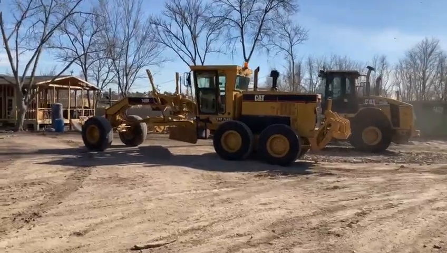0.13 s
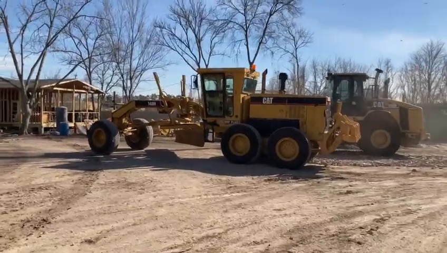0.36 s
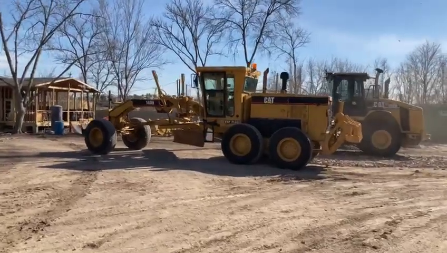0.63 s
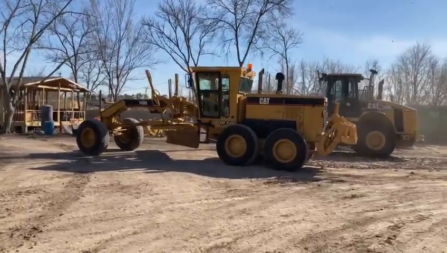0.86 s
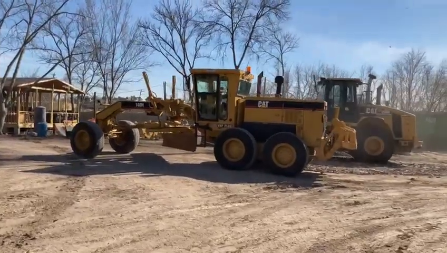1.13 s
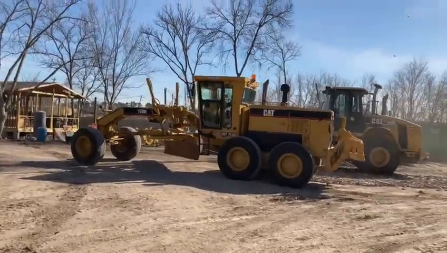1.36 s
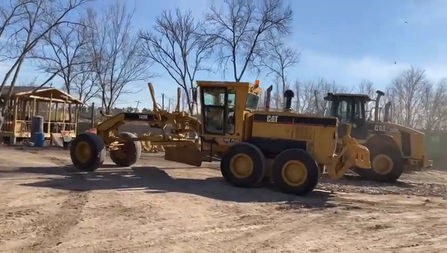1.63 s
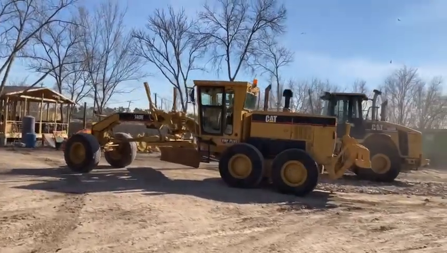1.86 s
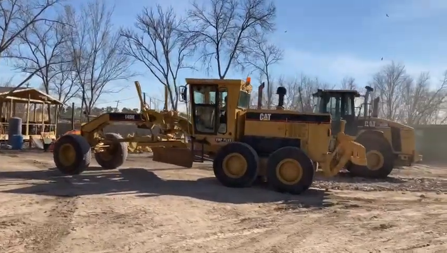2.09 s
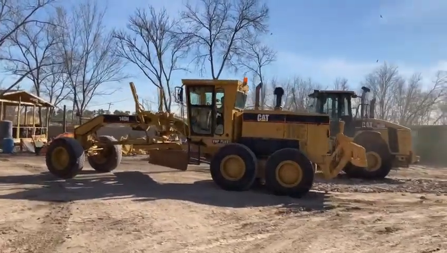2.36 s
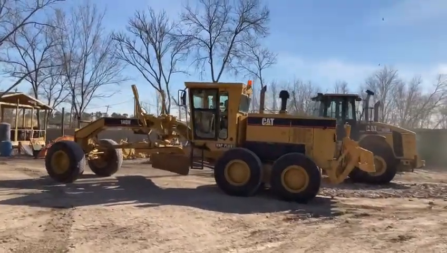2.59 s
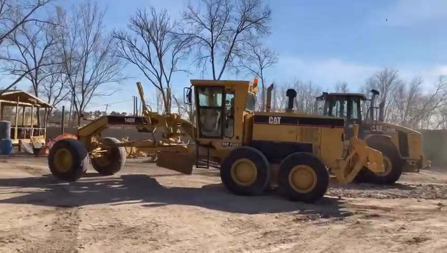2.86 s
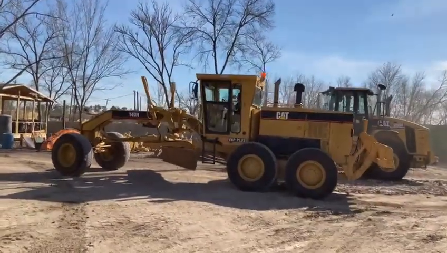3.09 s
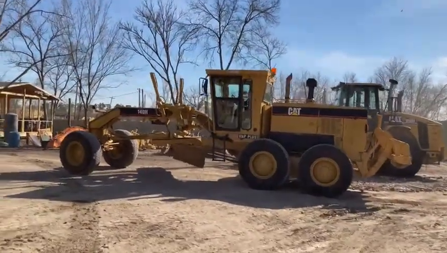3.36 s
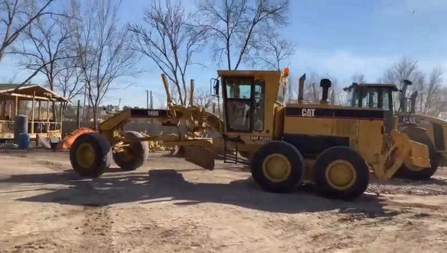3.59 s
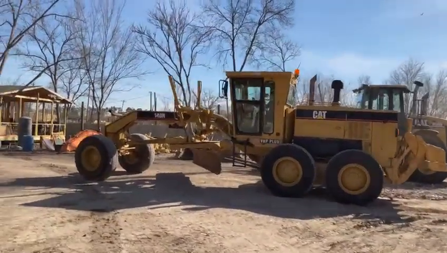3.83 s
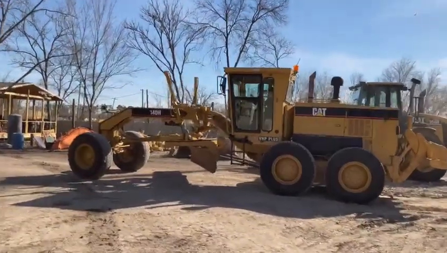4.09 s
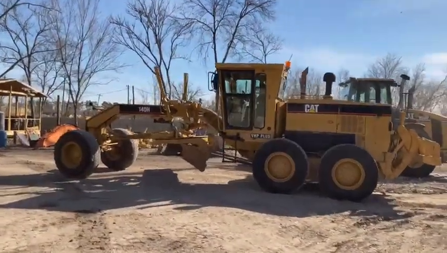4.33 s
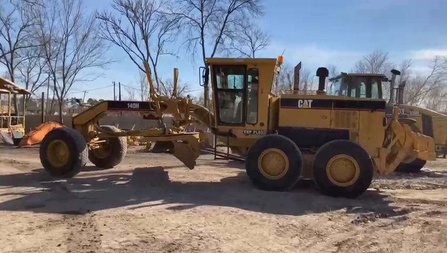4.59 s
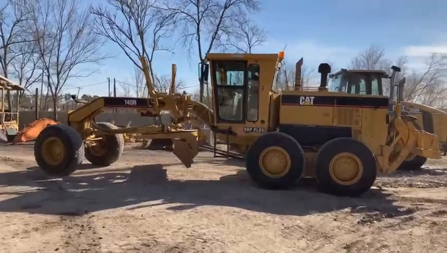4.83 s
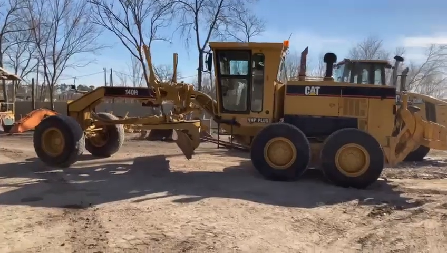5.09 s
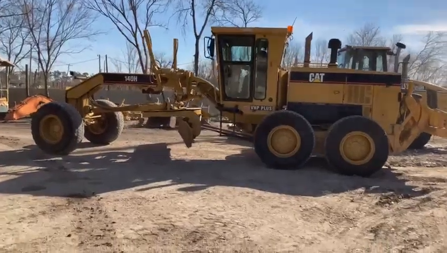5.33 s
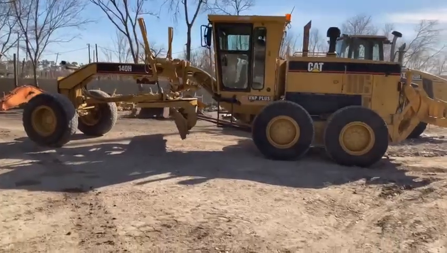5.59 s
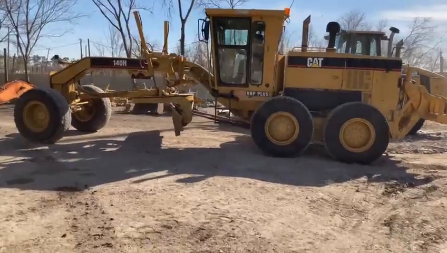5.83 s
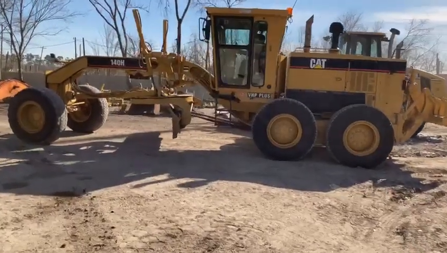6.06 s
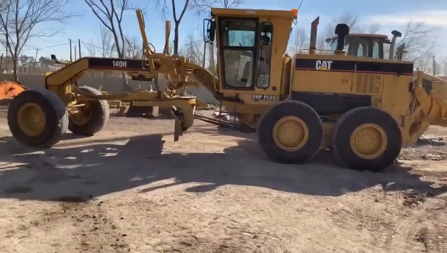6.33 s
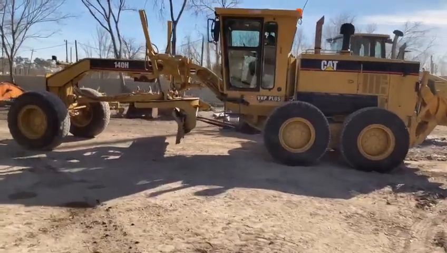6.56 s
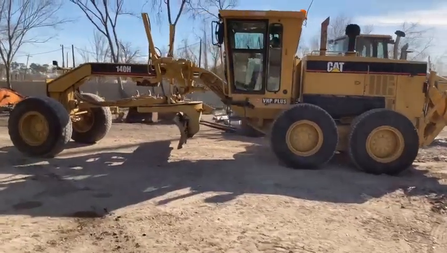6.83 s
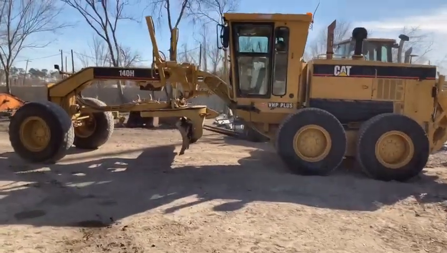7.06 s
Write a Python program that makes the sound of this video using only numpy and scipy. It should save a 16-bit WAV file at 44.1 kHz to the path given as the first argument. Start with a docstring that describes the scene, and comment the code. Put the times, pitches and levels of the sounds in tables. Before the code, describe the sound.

Outdoors in an open dirt yard, a hand-held stereo recorder picks up a large diesel grader. It idles slow and lumpy with a few soft wind thumps, surges up in pitch, sags briefly, surges again, then settles into a fast steady engine drone. Panels ring, valves and gears clatter, cooling air hisses and a loose part rattles lightly as it grows louder and closer.

```python
"""Road grader drawing near

A six-cylinder road grader idles in a dirt yard, revs up in two surges and settles at a steady speed as it nears.
The exhaust hums on the firing order, sine tones ring on multiples of the shaft speed, and noise that jumps
at the firings makes panels ring, clatter and cooling air. A part rattles, a low drone joins in late,
and a little wind buffets the two microphone ports of a hand-held recorder."""
import sys
import numpy as np
from scipy import signal
from scipy.fft import rfft, irfft, next_fast_len
from scipy.io import wavfile
from scipy.ndimage import uniform_filter1d

SR = 44100
rng = np.random.default_rng(int(sys.argv[2]) if len(sys.argv) > 2 else 0)


def volts_from_db(level):
    """Convert decibel levels to linear amplitude ratios."""
    exponent = np.asarray(level, float) / 20
    return 10 ** exponent


def dump(signal):
    """Clip the signal to [-1, 1] and save it as 16-bit WAV at the path in sys.argv[1]."""
    limited = np.clip(np.atleast_2d(signal).T, -1, 1)
    pcm = np.round(limited * 32767).astype(np.int16)
    wavfile.write(sys.argv[1], SR, pcm)


N = 317079


def unit(x):
    """Scales a sound to an rms (average strength) of 1."""
    return x / np.sqrt(np.mean(x ** 2) + 1e-20)


def in_time(rows):
    """Joins each column of a table by straight lines, one value a sample."""
    s, *columns = np.transpose(rows)
    return [np.interp(np.arange(N) / SR, s, c) for c in columns]


def shaped(x, hz, gain_db):
    """Filter whose dB curve is straight on a log-frequency axis."""
    size = next_fast_len(N)
    bins = np.log(np.arange(size // 2 + 1) * SR / size + 1)
    gain = volts_from_db(np.interp(bins, np.log(hz), gain_db))
    return irfft(rfft(x, size) * gain, size)[..., :N]


def drift(rate_hz):
    """Slow random wandering of rms 1, made at every 40th sample and joined by lines."""
    r = np.exp(-80 * np.pi * rate_hz / SR)
    noise = rng.standard_normal(N // 40 + 2002)
    slow = signal.lfilter([1], [1, -2 * r, r * r], noise)[2000:]   # skip the filter's start
    return np.interp(np.arange(N) / 40, np.arange(len(slow)), unit(slow - slow.mean()))


def resonance(x, hz, width_hz):
    """Rings like a struck panel or pipe: a two-pole band with gain 1 on top."""
    r = np.exp(-np.pi * width_hz / SR)
    poles = [1, -2 * r * np.cos(2 * np.pi * hz / SR), r * r]
    return signal.lfilter([(1 - r * r) / 2, 0, (r * r - 1) / 2], poles, x)


# how fast the crankshaft turns: [t/s, speed/turns per s]
CRANK_SPEED = [(0.0, 13.43), (1.3, 13.43), (1.5, 14.6), (1.62, 16.7), (1.98, 19.5), (2.1, 18.95),
               (2.25, 17.95), (2.4, 17.55), (2.55, 17.75), (2.7, 18.55), (2.8, 19.55), (2.97, 21.75),
               (3.05, 22.0), (3.2, 22.3), (3.78, 22.85), (4.1, 23.9), (4.4, 24.22), (4.55, 24.57),
               (4.72, 24.57), (4.83, 24.3), (5.15, 24.58), (5.5, 24.74), (5.65, 24.66), (5.82, 24.43),
               (6.12, 24.48), (6.5, 24.31), (7.19, 24.37)]


def crank_speed():
    """The shaft speed sets the pitch of all engine tones and the pace of the knocks."""
    return in_time(CRANK_SPEED)[0]


# state of the machine: [t/s, stage (0 idle, 1 revving, 2 close by)]
MACHINE_STAGE = [(0, 0.), (1.15, 0.), (1.5, 1.), (3.6, 1.), (4.8, 2.), (7.19, 2.)]


def by_stage(values):
    """Glides between the values for idle, revving and close by."""
    return np.interp(in_time(MACHINE_STAGE)[0], [0, 1, 2], values)


# work of the engine as heard: [t/s, exhaust note level/dB, clatter and air level/dB]
ENGINE_EFFORT = [(0.0, -45, -36.5), (0.6, -36.5, -40), (1.0, -37.5, -39.5), (1.3, -38, -38),
                 (1.42, -33, -34.5), (1.52, -29.5, -35), (1.65, -27.5, -32.5), (1.85, -26, -33),
                 (2.05, -28.5, -36.5), (2.25, -27.5, -35), (2.4, -24.5, -32.5), (2.7, -25, -31.5),
                 (2.85, -22, -29.5), (3.0, -25, -30.5), (3.2, -25.5, -31), (3.5, -26, -31.5),
                 (4.0, -23.5, -30.5), (4.5, -22, -29.5), (5.5, -22.5, -29), (6.5, -22, -29),
                 (7.19, -22, -29.5)]


def effort():
    """A harder-working engine sounds louder: levels of the exhaust note and of the air."""
    return in_time(ENGINE_EFFORT)


# octave above the exhaust note: [speed/turns per s, level against the note/dB]
OCTAVE_LEVEL = [(13.4, -1), (14.7, 2), (16.4, -13), (17.5, -6), (18.3, -4), (19.3, -3.5), (21.0, -3),
                (22.5, 0), (24.3, 1), (24.7, 1)]


def hum(turns, speed, note_db, waver_db):
    """Three firings a turn make the exhaust note; its octave keeps step but wavers on its own."""
    octave_db = note_db + np.interp(speed, *np.transpose(OCTAVE_LEVEL))
    third = volts_from_db(note_db + waver_db * drift(9)) * np.cos(6 * np.pi * turns)
    sixth = volts_from_db(octave_db + waver_db * drift(9)) * np.cos(12 * np.pi * turns + .9)
    return np.sqrt(2) * (third + sixth)


# block and gear train tones, before the overall lift, shifting as the machine turns and nears:
# [multiple of the shaft speed, idle level/dB, level/dB at each of four moments at working speed]
SHAFT_TONES = [(3.5, -60, -50, -39, -40, -40), (4, -60, -46, -44, -39, -43), (7, -55, -39, -38, -37, -35),
               (9, -41, -42, -48, -50, -50), (10, -55, -48, -38, -37, -36), (11, -50, -45, -39, -37, -38),
               (11.5, -50, -41, -46, -52, -50), (12, -55, -43, -42, -37, -36),
               (13, -58, -46, -39, -39, -43), (14, -49, -44, -43, -45, -42), (15, -58, -58, -52, -44, -42),
               (16, -58, -50, -46, -41, -35), (17, -58, -45, -37, -34, -35), (18, -58, -42, -35, -38, -40),
               (20, -49, -52, -50, -50, -48), (21, -60, -42, -45, -44, -43), (24, -49, -50, -50, -48, -47),
               (25.5, -60, -42, -46, -42, -40), (27, -60, -42, -45, -46, -45),
               (29, -60, -48, -46, -42, -39), (31, -60, -52, -43, -40, -37), (32, -60, -55, -40, -40, -41),
               (33, -62, -43, -50, -52, -52), (36, -50, -50, -43, -46, -50), (38, -51, -56, -37, -37, -38),
               (40, -56, -60, -54, -52, -45), (41, -58, -60, -49, -46, -46), (42, -60, -60, -54, -43, -43),
               (43, -54, -54, -49, -45, -42), (43.5, -60, -55, -46, -45, -41),
               (44, -60, -58, -46, -43, -41), (44.5, -58, -58, -41, -48, -46),
               (45, -56, -58, -44, -40, -41), (46, -49, -56, -52, -56, -50), (47, -52, -54, -46, -46, -49),
               (48, -52, -50, -39, -38, -50), (49, -54, -43, -50, -56, -56), (51, -52, -58, -54, -46, -44),
               (52.5, -50, -60, -54, -43, -52), (53, -46, -60, -56, -46, -52),
               (54, -56, -60, -58, -52, -43), (55, -51, -60, -55, -48, -52),
               (55.5, -58, -60, -51, -47, -45), (58, -60, -60, -60, -56, -46),
               (58.5, -60, -60, -56, -48, -42), (61.5, -56, -58, -49, -46, -55),
               (63, -62, -49, -53, -48, -50), (78, -53, -62, -58, -60, -58), (79, -60, -60, -50, -56, -49),
               (82.5, -52, -58, -46, -60, -60), (84, -58, -60, -48, -58, -58)]
# those four moments: [t/s]
NEARING_MOMENTS = [3.5, 4.55, 5.4, 6.3]
# the idle tones fade between these: [speed/turns per s]
IDLE_FADE = [13.5, 14.5]
# the working tones swell in from the first speed to WORKING_TURNS (turns per s)
TONES_FROM_TURNS, WORKING_TURNS = 17.8, 22.0


def shaft_tones(turns, speed, lift_db, waver_db):
    """Each multiple of the shaft rings at idle, fades, swells in at working speed and wavers on its own."""
    out, s = np.zeros(N), np.arange(N) / SR
    idling = np.interp(speed, IDLE_FADE, [1, 0])
    working = np.clip((speed - TONES_FROM_TURNS) / (WORKING_TURNS - TONES_FROM_TURNS), 0, 1)
    for order, idle_db, *place_db in SHAFT_TONES:
        gain = idling * volts_from_db(idle_db) + working * volts_from_db(np.interp(s, NEARING_MOMENTS, place_db))
        # orders below 20 peak nearly together, a knock once a turn
        spread_turns = .018 if order < 20 else 1
        late = rng.standard_normal() * spread_turns
        out += gain * volts_from_db(waver_db * drift(1.2)) * np.cos(2 * np.pi * order * (turns + late))
    return np.sqrt(2) * volts_from_db(lift_db) * out


def surge(speed):
    """How hard the engine accelerates, 0-1; full at 6.3 turns per s gained each second."""
    acceleration = uniform_filter1d(np.gradient(speed) * SR, size=4410)
    return np.clip(acceleration / 6.3, 0, 1)


# growling shaft tones: [multiple of the shaft speed, level before the pipe/dB]
GROWL_TONES = [(4, -8), (4.5, -1), (8, -6), (9, 2), (12, 1), (13, 6), (14, -9), (15, -3), (16, -11),
               (21, 4), (22, -6), (24, 0), (33, -8), (36, -1), (38, 0), (39, 2), (40, -3)]
# resonances of the exhaust line that lift a tone sweeping through them: [f/Hz, width/Hz, level/dB]
EXHAUST_PIPE = [(91, 17, -14), (156.6, 31, -7), (219, 19, -11), (276.4, 34, -8), (439, 46, -13.5),
                (621, 46, -11.5), (786, 35, -11)]


def surge_tones(turns, speed, note_db, uneven_db):
    """Wavering shaft tones ring the exhaust pipe, strongest in a surge, never silent below working speed."""
    orders = 0
    for order, db in GROWL_TONES:
        tone = np.cos(2 * np.pi * (order * turns + rng.random()))
        orders = orders + volts_from_db(db + uneven_db * drift(12.0)) * tone
    rings = 0
    for hz, width, db in EXHAUST_PIPE:
        rings = rings + volts_from_db(db) * resonance(resonance(orders, hz, width), hz, width)
    pull = np.maximum(surge(speed), 0.47 * (speed < WORKING_TURNS))
    return np.sqrt(2) * volts_from_db(note_db) * uniform_filter1d(pull, size=2205) * rings


# share of the repeating blows at idle, revving and close by: [factor]
BLOW_SHARE = [2.2, 1.0, 1.0]


def cycle_pattern(turns, speed):
    """Valves, gears and pumps repeat a fine pattern of blows each two-turn engine cycle; it changes slowly."""
    steps = 512
    patterns = rng.standard_normal((2, steps))
    patterns = unit(patterns + .3 * np.roll(patterns, steps // 2, axis=1))   # the two turns are rather alike
    place = turns / 2 % 1 * steps
    first, second = (np.interp(place, np.arange(steps), p, period=steps) for p in patterns)
    blend = .9 * drift(.55)
    # more steps a second spread the sound wider, so it grows with speed
    density = np.sqrt(speed / 2 * steps / SR)
    return by_stage(BLOW_SHARE) * density * (np.cos(blend) * first + np.sin(blend) * second)


# strength of each firing in turn, before the random unevenness: [level/dB]
CYLINDER_STRENGTH = [1, -7, -3, -14, -10, -4]


def knocks(turns, depth, uneven_db):
    """Noise that jumps at every firing and dies down before the next; strengths vary at random."""
    firing = 3 * turns
    count = firing.astype(int)
    uneven = uneven_db * np.tanh(rng.standard_normal(600))[count]
    strength = volts_from_db(np.take(CYLINDER_STRENGTH, count, mode="wrap") + uneven)
    gate = 1 + depth * strength * np.exp(-3.0 * (firing - count))
    return unit(gate) * rng.standard_normal((2, N))


# colour of the low rush, before it is scaled: [f/Hz, relative level/dB per Hz]
RUSH_COLOUR = [(25, -25), (45, 5.5), (100, 0.5), (200, 0), (330, -5), (600, -6), (1200, -36.5)]


def rush(turns, pattern):
    """Low roar: noise jumping at the firings, plus the repeating blows, filtered to low pitches."""
    blows = knocks(turns, depth=0.29, uneven_db=19.5) + 0.31 * pattern
    return unit(shaped(blows, *np.transpose(RUSH_COLOUR)))


# how deeply the treble throbs with the firings at idle, revving and close by: [depth]
BEAT_DEPTH = [.3, .15, .05]


def firing_beat(turns):
    """A gain that rises and falls three times a turn, once a firing."""
    return 1 + by_stage(BEAT_DEPTH) * np.cos(6 * np.pi * turns)


# hood panels and casing, relative to each other:
# [f/Hz, width/Hz, idle level/dB, revving level/dB, close-by level/dB]
PANELS = [(286, 36, -16, -26, -11), (444, 187, -2, 1.5, 3), (641, 56, 1.5, 5, -7), (682.6, 75, 3, 4, 1.5),
          (724, 128, -5.5, 1, -9), (1098, 83, -1, 2.5, -2.5), (1254, 180, -4, -6.5, -10),
          (1850, 310, -10.5, -11, -23), (1998, 78, -5, -11, -13.5), (2142, 99, -14, -9.5, -12),
          (2314, 39, -36, -30, -15), (2563, 33, -9, -19, -39), (3000, 84, -17, -14.5, -13.5),
          (3267, 23, -18, -33, -61), (3520, 730, -24, -16.5, -32)]


def casing(drive, beat):
    """The knocks ring the panels; their balance shifts as the machine revs, turns and nears."""
    rings = 0
    for k, (hz, width, *stage_db) in enumerate(PANELS):
        level_db = by_stage(stage_db) + .7 * drift(1.5) + 1.8 * drift(9)
        throb = beat if hz > 1500 else 1
        # two passes narrow a band, so each is made wider
        ring = resonance(resonance(drive, hz, 1.62 * width), hz, 1.62 * width)
        rings = rings + (-1) ** k * volts_from_db(level_db) * throb * unit(ring)
    return unit(rings)


# colour of clatter and air, before it is scaled: [f/Hz, relative level/dB per Hz]
AIR_COLOUR = [(300, -13.5), (900, -1.5), (1600, -9.5), (2500, -13), (4300, -16.5), (5600, -20), (6700, -17),
              (8000, -16), (10800, -5.5), (11700, -10.5), (12000, -79)]


def air(turns, pattern):
    """Clatter and cooling air: bands of knocking noise that flutter apart."""
    out, edges_hz = 0, [100, 1600, 2800, 4200, 5600, 9000, 16000]
    for low, high in zip(edges_hz[:-1], edges_hz[1:]):
        band = signal.butter(4, [low, high], "band", fs=SR, output="sos")
        flutter = volts_from_db(0.85 * drift(10.0) + 0.92 * drift(41))
        noise = knocks(turns, depth=0.1, uneven_db=18.5) + pattern
        out = out + flutter * signal.sosfilt(band, noise)
    return unit(shaped(out, *np.transpose(AIR_COLOUR)))


# how loud the loose part is: [t/s, level/dB]
RATTLE_STRENGTH = [(0, -64), (0.9, -59), (1.2, -60), (1.45, -55), (1.66, -48.5), (1.85, -57), (2.1, -80),
                   (2.9, -57), (3.3, -48), (3.6, -59), (4.5, -51), (7.19, -75)]


def rattle(turns, speed, sharpness, uneven_db, width_hz):
    """A loose part: a narrow band of noise that flares once an engine cycle and climbs in a surge."""
    hz = 3760 + 280 * surge(speed)
    level_db, = in_time(RATTLE_STRENGTH)
    blow_s = 3.345   # time of one of its blows
    cycle = (turns - turns[int(blow_s * SR)]) / 2
    strength = volts_from_db(uneven_db * rng.standard_normal(200)[np.round(cycle).astype(int)])
    flare = 0.5 + strength * np.exp(sharpness * (np.cos(2 * np.pi * cycle) - 1))
    # slow noise carried up to the rattle's pitch
    lowpass = signal.butter(2, width_hz / 2, fs=SR, output="sos")
    low = signal.sosfilt(lowpass, rng.standard_normal((2, 2, N)))
    angle = 2 * np.pi * np.cumsum(hz) / SR
    return volts_from_db(level_db) * unit(flare * (low[0] * np.cos(angle) + low[1] * np.sin(angle)))


# wind on the ports, before its random lumps: [t/s, level/dB]
WIND_LEVEL = [(0, -37), (.42, -33), (.6, -40), (1.5, -40), (3, -52), (5, -46), (7.19, -52)]
# gusts that thump both ports: [t/s, level/dB, f/Hz, length/s]
WIND_THUMPS = [(0.067, -18, 63, 0.01), (.225, -22, 124, 0.016), (0.299, -19.5, 95, 0.029),
               (0.42, -14, 98, 0.0056), (0.478, -29, 52, 0.036)]


def wind():
    """Lumpy low noise, partly shared by the ports, and a few short low thumps."""
    shared, own = rng.standard_normal(N), rng.standard_normal((2, N))
    lumps = volts_from_db(in_time(WIND_LEVEL)[0] + 7.0 * np.tanh(drift(18)))
    hz, gain_db = [15, 45, 90, 300, 600, 1500], [-30, -4.0, -3.5, -34.0, -42, -110]
    out = lumps * unit(shaped(shared + 1.2 * own, hz, gain_db))
    s = np.arange(SR) / SR   # all thumps fall in the first second
    for at, db, f, length in WIND_THUMPS:
        swell = np.exp(-((s - at) / length) ** 2)
        out[:, :SR] += volts_from_db(db) * swell * np.sin(2 * np.pi * f * (s - at))
    return out


def drone():
    """A soft low sine that sets in late, wavers and creeps upward."""
    from_s, swell_s, level_db = 4.5, 0.34, -33
    start_hz, rise_from_s, rise_hz_per_s = 48.5, 6.1, 2.2
    s = np.arange(N) / SR
    hz = start_hz + rise_hz_per_s * np.maximum(s - rise_from_s, 0)
    swell = np.clip((s - from_s) / swell_s, 0, 1)
    return np.sqrt(2) * swell * volts_from_db(level_db + 1.2 * drift(5.4)) * np.sin(2 * np.pi * np.cumsum(hz) / SR)


# the two ports: [f/Hz, shared level/dB, opposed level/dB, lean (left positive)]
MIC_PORTS = [(60, 1, -36, -0.082), (140, 0, -14.5, -0.091), (317, 0.5, -25.5, 0.036), (700, 1, -16, -0.059),
             (1190, -0.5, -13.5, 0.15), (1630, 4, -1.5, 0.27), (3070, 2.5, -8.5, 0.13),
             (4000, 5.5, -14.5, 0.053), (4930, 0, -13, 0.011), (5650, -3, 2, 0.043), (6100, 0.5, -14, -0.1),
             (6540, 1, -43, -0.14), (7320, -1.5, -42, -0.057), (8260, -9, -5, 0), (8000, 1.5, 6.5, 0),
             (8490, -41, -11.5, 0), (9620, -36.5, -11.5, 0.1), (10090, -20.5, -21, 0),
             (10840, -17, -40, 0.07)]


def ports(direct, scattered):
    """The two ports hear a shared sound, leaning left or right by pitch, and an opposed one."""
    hz, shared_db, opposed_db, lean = np.transpose(MIC_PORTS)
    mid = shaped(direct, hz, shared_db)
    left, right = (shaped(mid, hz, 20 * np.log10(1 + sign * lean)) for sign in (1, -1))
    late = np.roll(direct, shift=6)   # sound reaches the rear port six samples later
    side = shaped(0.4 * late + 1.07 * scattered, hz, opposed_db)
    return np.array([left + side, right - side])


def scene():
    """Row 0 of each noise arrives straight, row 1 scattered off the yard; the ports mix them."""
    speed = crank_speed()
    turns = np.cumsum(speed) / SR
    note_db, air_db = effort()
    air_swing_db, note_swing_db = air_db - air_db.mean(), note_db - note_db.mean()

    tones = hum(turns, speed, note_db, waver_db=0.6)
    tones = tones + shaft_tones(turns, speed, lift_db=-0.5, waver_db=1.3)
    tones = tones + surge_tones(turns, speed, note_db, uneven_db=1.5) + drone()

    pattern = np.array([cycle_pattern(turns, speed) for row in (0, 1)])
    # rush and ring follow a small share of the swings in effort
    rush_db = by_stage([-36, -30.5, -29.5]) + 0.095 * air_swing_db
    roar = volts_from_db(rush_db) * rush(turns, pattern)
    beat = firing_beat(turns)
    blows = knocks(turns, depth=.7, uneven_db=4.0) + pattern
    ring_db = by_stage([-35, -32, -28.5]) + 0.094 * air_swing_db + 0.14 * note_swing_db
    ring = volts_from_db(ring_db) * casing(blows, beat)
    clatter = volts_from_db(air_db) * beat ** 0.18 * air(turns, 0.5 * pattern)
    clicks = rattle(turns, speed, sharpness=4.5, uneven_db=1.5, width_hz=210)

    # the tones arrive straight only
    direct, scattered = roar + ring + clatter + clicks + tones * [[1], [0]]
    return ports(direct, scattered) + wind()


def low_pass(x):
    """Removes everything above the highest recorded frequency."""
    return signal.sosfilt(signal.butter(12, 12930, fs=SR, output="sos"), x)


def record(dry):
    """Turns the finished mix into the sound that is written."""
    return low_pass(dry)


dry = scene()
out = record(dry)
dump(out)
```